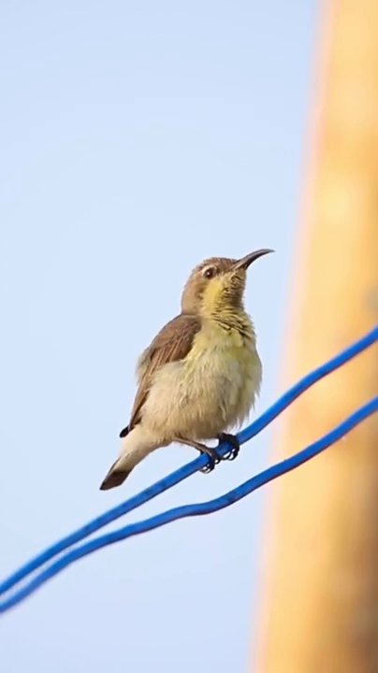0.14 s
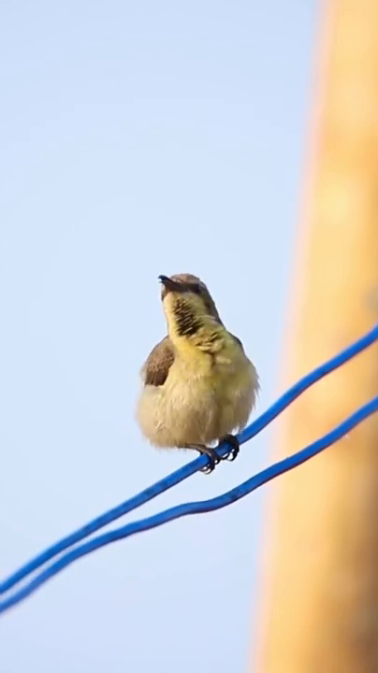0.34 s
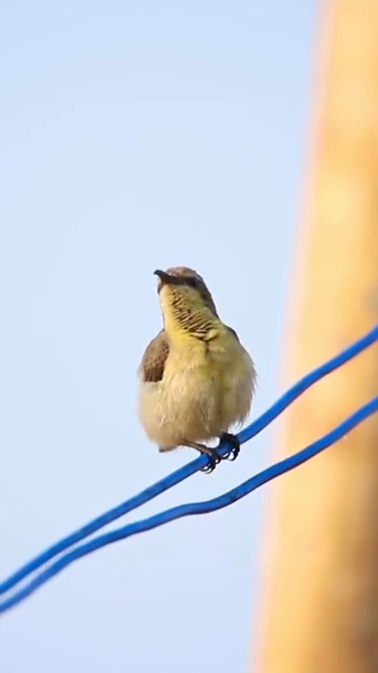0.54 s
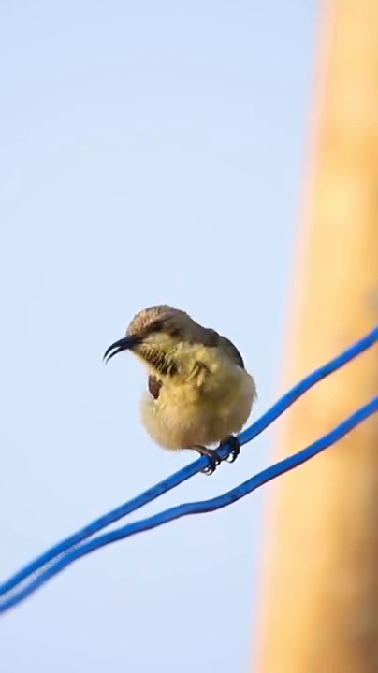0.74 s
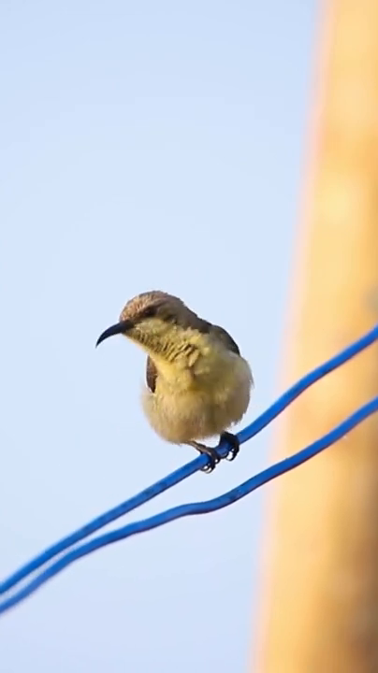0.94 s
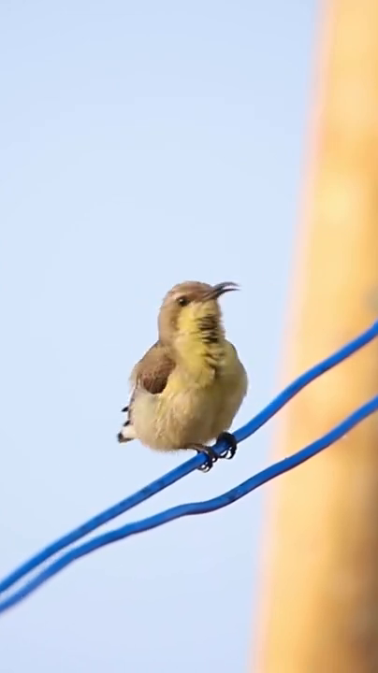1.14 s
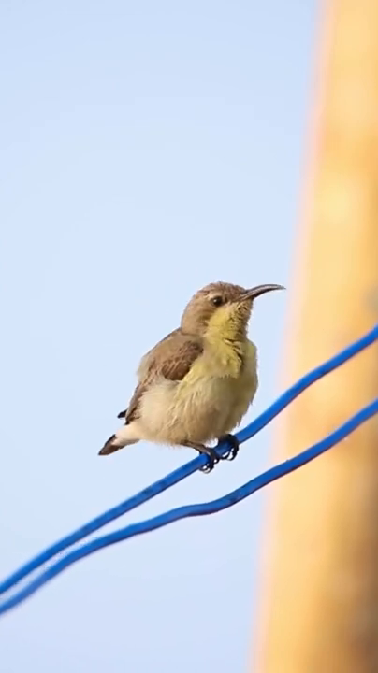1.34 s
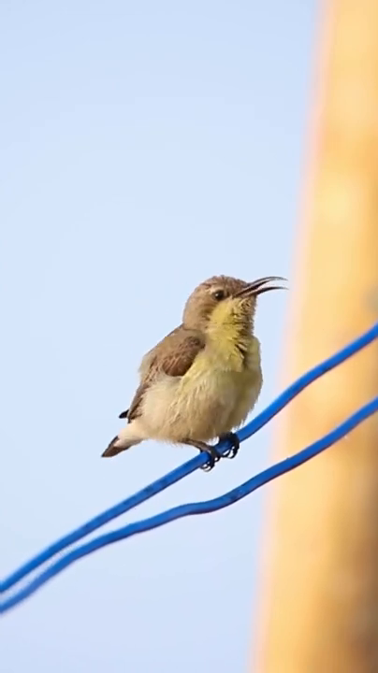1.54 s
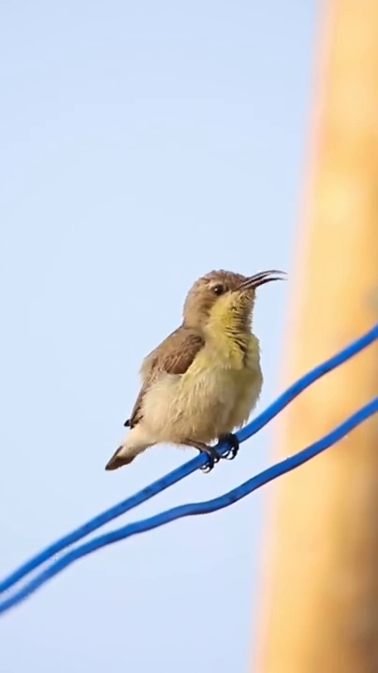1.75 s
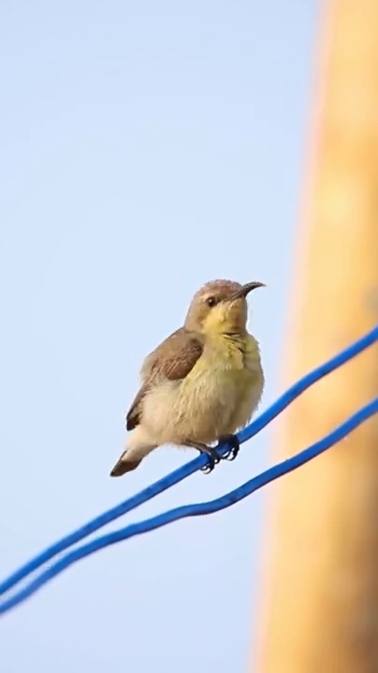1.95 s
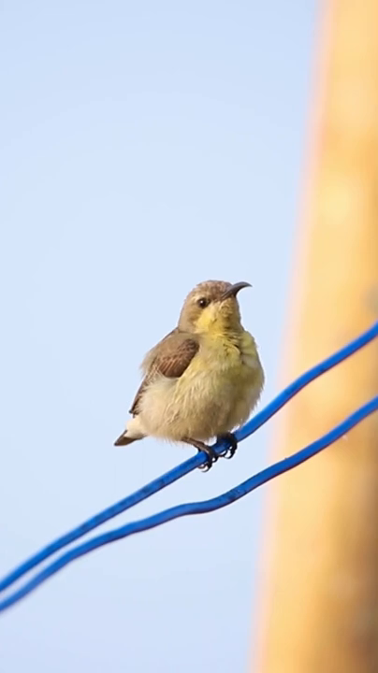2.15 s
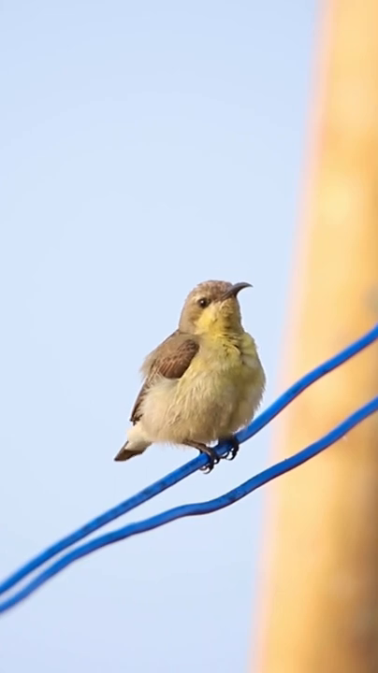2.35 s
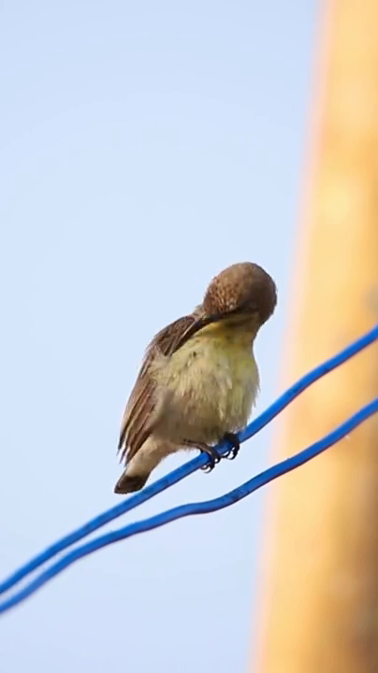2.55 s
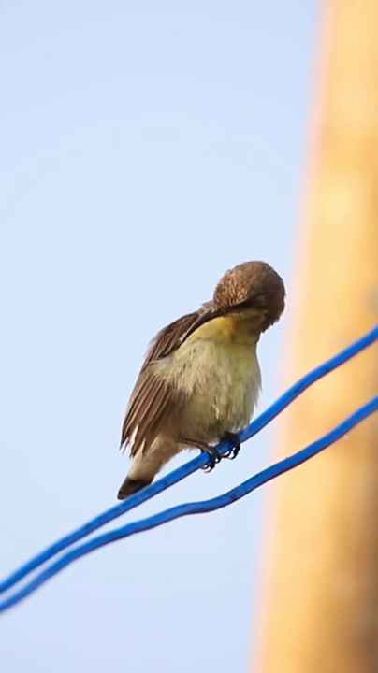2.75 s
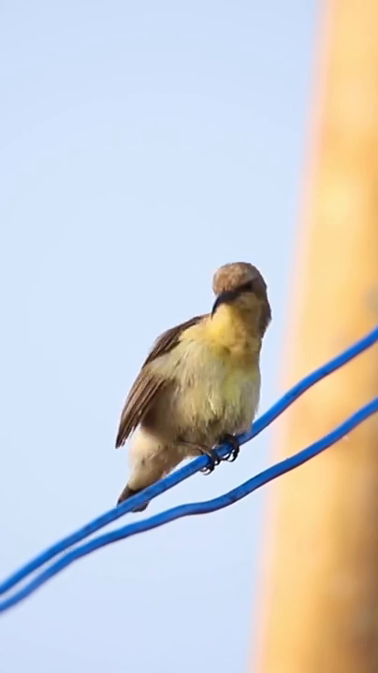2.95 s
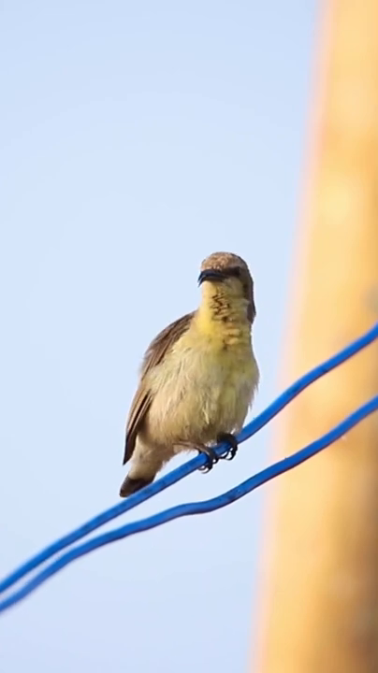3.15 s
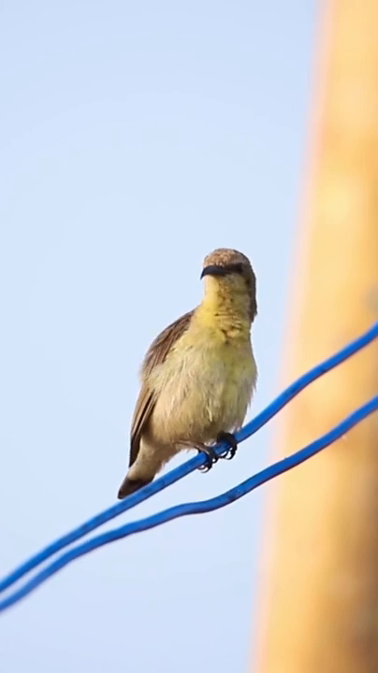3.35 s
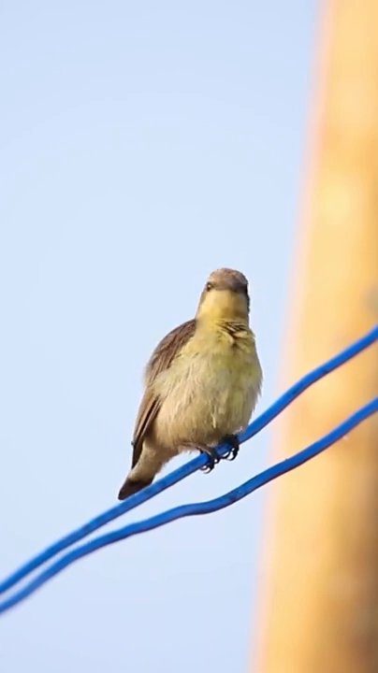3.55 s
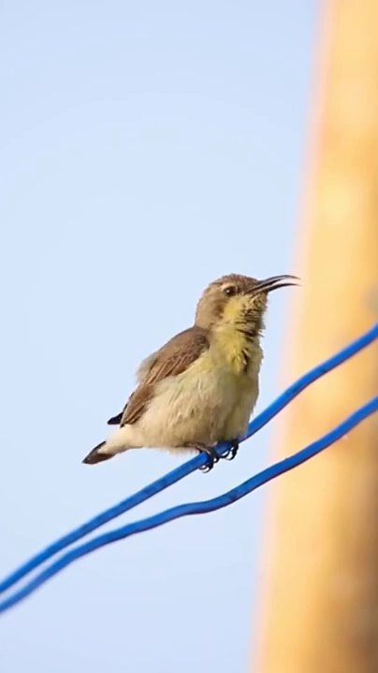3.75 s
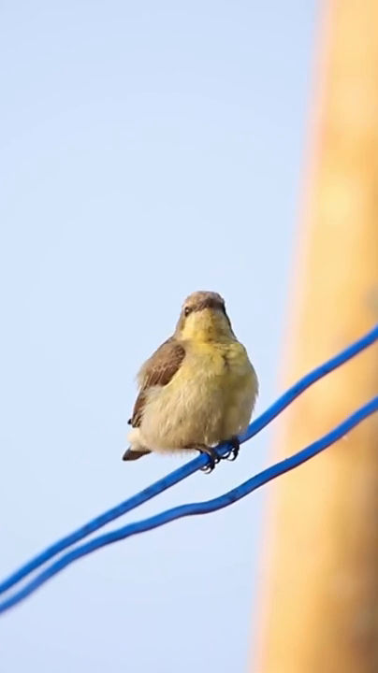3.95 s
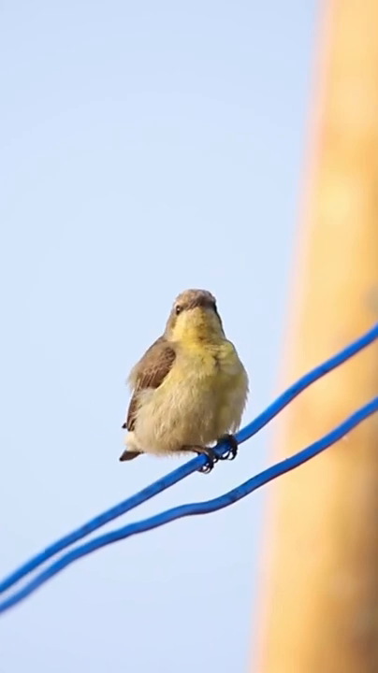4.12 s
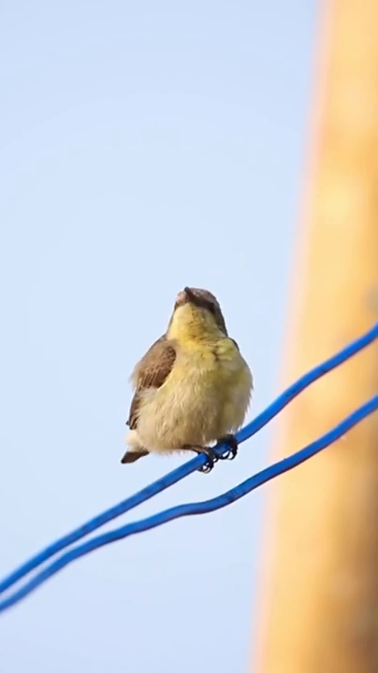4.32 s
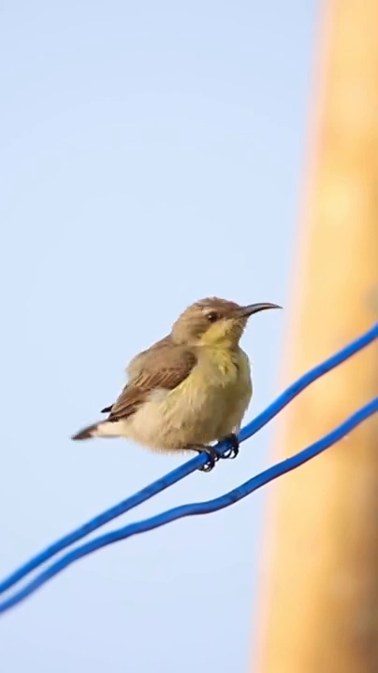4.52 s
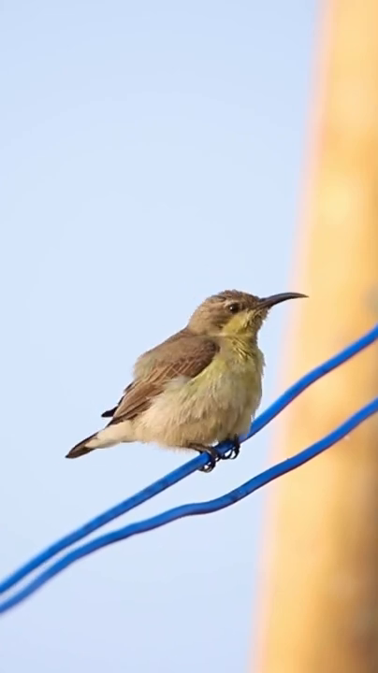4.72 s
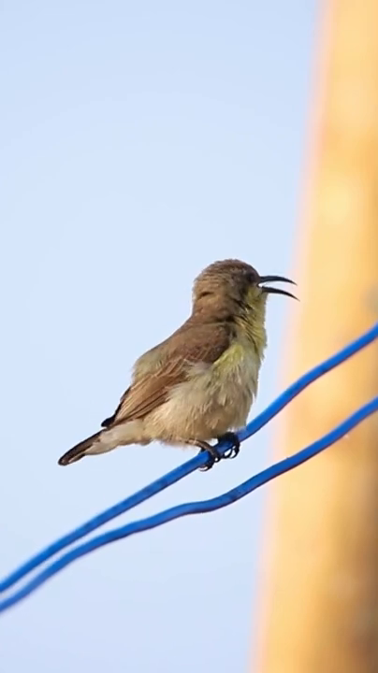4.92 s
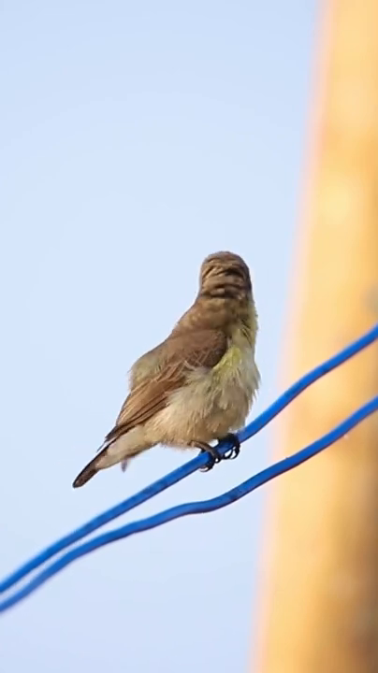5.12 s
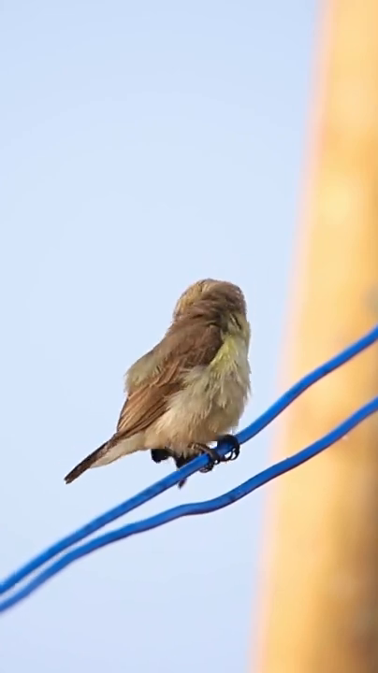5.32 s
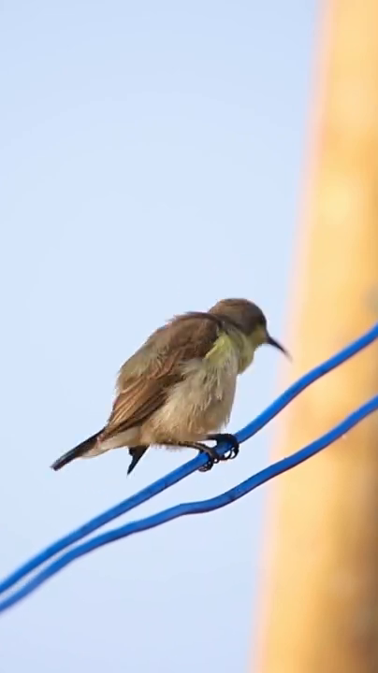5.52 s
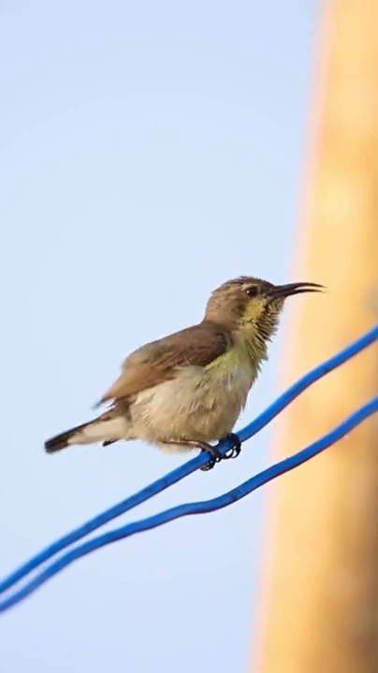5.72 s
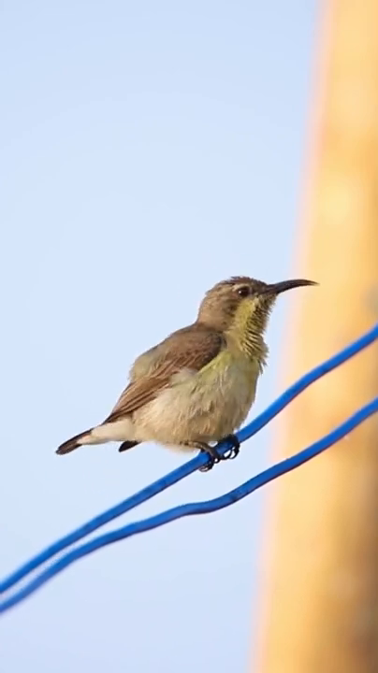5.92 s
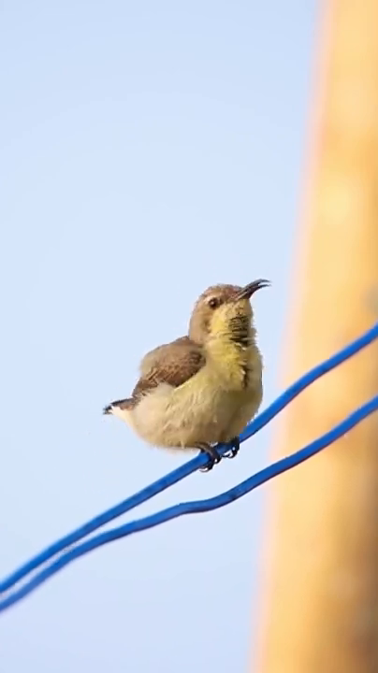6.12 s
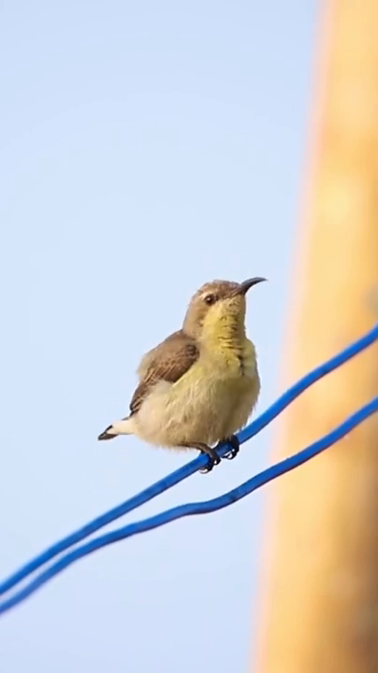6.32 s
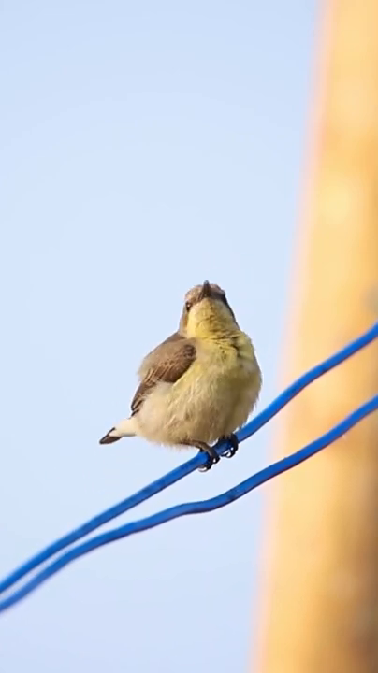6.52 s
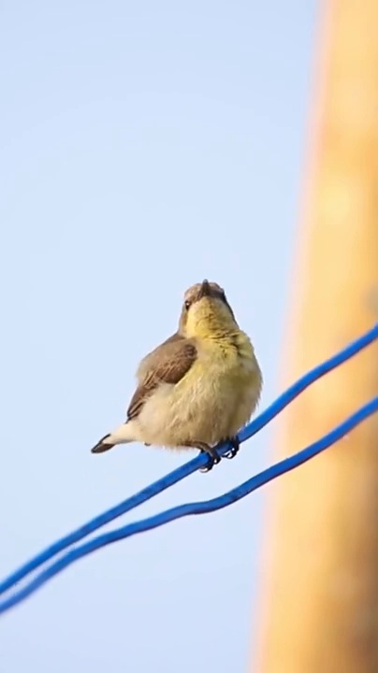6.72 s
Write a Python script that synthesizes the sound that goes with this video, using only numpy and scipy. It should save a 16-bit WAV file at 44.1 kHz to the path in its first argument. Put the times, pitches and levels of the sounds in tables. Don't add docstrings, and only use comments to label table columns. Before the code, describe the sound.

Quiet morning among houses, captured by a stereo camera microphone. One near bird dominates with irregularly spaced, rising chirps: several early, a gap around two to three seconds, then a loud one and more until the end. Beneath are soft low hum and hiss, very faint dove coos, sliding far bird calls, a barely audible distant motor tone and a steady faint high camera whine.

```python
import sys
import numpy as np
from scipy import signal
from scipy.fft import rfft, irfft, next_fast_len
from scipy.io import wavfile
from scipy.ndimage import uniform_filter1d, minimum_filter1d, map_coordinates

SR = 44100
rng = np.random.default_rng(int(sys.argv[2]) if len(sys.argv) > 2 else 0)


def boost_factor(decibels):
    exponent = np.asarray(decibels, float) / 20
    return 10 ** exponent


def generate_wav(sig):
    pcm = np.round(np.clip(np.atleast_2d(sig).T, -1, 1) * 32767).astype(np.int16)
    wavfile.write(sys.argv[1], SR, pcm)


N = 298557
T = np.arange(N) / SR


def unit(x):
    return x / np.sqrt(np.mean(x ** 2) + 1e-20)


def along(points, hz):
    f, v = np.transpose(points)
    return np.interp(np.log(hz + 1), np.log(f + 1), v)


def wobble(rate):
    knots = rng.standard_normal(int(N * rate / SR) + 4)
    return map_coordinates(knots, [T * rate])


def filtered(x, response):
    m = next_fast_len(N + SR // 2)
    return irfft(rfft(x, m) * response(np.fft.rfftfreq(m, 1 / SR)), m)[..., :N]


# time from the knee in seconds, pitch in Hz.
CLIMB = [
    (-.029, 2080),
    (-.014, 2600),
    (-.009, 3060),
    (0, 3320),
]
RASP_RISE = .055
SHELF_S, SHELF_HZ, TOP_AT = .032, 4039, 0.98


def chirp_pitch(t, knee, span, top_hz, rush, rasp_hz):
    climb, climb_hz = np.transpose(CLIMB)
    rush_s, rush_hz = rush
    rasp = rasp_hz * (1 + RASP_RISE * np.array([-.5, .5]))
    hz = np.interp(t, [knee - .052, knee - .036, *(knee + climb)], [*rasp, *climb_hz])
    rise = np.array([climb_hz[-1], SHELF_HZ, rush_hz, top_hz]) - climb_hz[-1]
    hz += np.interp(t - knee, [0, SHELF_S, rush_s, TOP_AT * span], rise)
    return uniform_filter1d(hz, size=70, mode="nearest")


RASP_OCTAVE_DB, RASP_TWELFTH_DB = -1, 0.5
OCTAVE_DB, TWELFTH_DB = -25.5, -28
BREAK_OCTAVE_DB, CLEAR_S = 9, 0.018
HALF_DB, HALF_FADE_DB_PER_S = -7.5, 1901
FLICKER_DB, HALF_TILT_DB = 4, -1


def overtones(turn, clear, after, half_db, part):
    octave_db = OCTAVE_DB + (BREAK_OCTAVE_DB - OCTAVE_DB) * np.exp(-after / CLEAR_S)
    voice = boost_factor(RASP_OCTAVE_DB + clear * (octave_db - RASP_OCTAVE_DB)) * np.sin(2 * turn)
    voice += boost_factor(RASP_TWELFTH_DB + clear * (TWELFTH_DB - RASP_TWELFTH_DB)) * np.sin(3 * turn)
    lines = 0
    for k in (3, 5, 7, 8, 9, 10):
        line_db = FLICKER_DB * wobble(80)[part] + HALF_TILT_DB * (k - 7)
        lines = lines + boost_factor(line_db) * np.sin(k / 2 * turn + k)
    return voice + boost_factor(HALF_DB + half_db - HALF_FADE_DB_PER_S * after) * lines


HISS_DB, HISS_FADE_DB_PER_S, CLEAR_HISS_DB, PUFF_DB = -8.5, 352, -42, 13.5
RASP_DB, ATTACK_S, ATTACK_DB = -25, 0.015, 16
BREAK_S, BREAK_DB, KNEE_DB = 0.033, -18.5, -8.5
JUMP_DB = 6
HOLD_DB, PUSH_AT, CREST_AT, CREST_DB = -7.5, 0.46, 0.86, -3
END_DB, RELEASE_S = -6, 0.007
# knee in seconds, glide in seconds, peak level in dB, top pitch in Hz.
CHIRPS = [
    (-0.085, 0.12, -29.5, 5294),
    (0.39, 0.12, -28, 5574),
    (0.78, .109, -28, 5560),
    (1.169, 0.12, -27, 5760),
    (1.65, .123, -28, 5486),
    (3.237, .113, -25.5, 5536),
    (3.746, 0.12, -28.5, 5500),
    (4.89, 0.12, -30.5, 5525),
    (5.793, 0.12, -28, 5390),
    (6.151, 0.13, -27.5, 5737),
]
# length before the knee in seconds, pitch in Hz,
# level of the half-pitch lines in dB.
RASPS = [(.066, 1530, -2), (.063, 1520, -1), (.066, 1550, -4), (.068, 1550, -7), (.068, 1550, -5),
         (.068, 1580, -6), (.068, 1520, 0), (.072, 1590, -2), (.064, 1560, -5), (.065, 1555, -7)]
# time after the knee in seconds, pitch in Hz.
RUSHES = [(.085, 4500), (.086, 4540), (.086, 4980), (.056, 4520), (.084, 4730), (.076, 4680), (.093, 4700),
          (.071, 4380), (.07, 4420), (.056, 4520)]
# frequency in Hz, gain in dB.
THROAT = [(700, -61), (1700, -23.5), (2500, -10.5), (3100, -8), (4600, 2), (6000, 1), (7200, -6.5),
          (8200, -13.5), (10000, -12), (16000, -15)]


def sunbird():
    x, shake, flutter = np.zeros(N), wobble(300), wobble(70)
    air = filtered(rng.standard_normal(N), lambda hz: 1 / (1 + (hz / 7500) ** 8))
    for (knee, span, db, top_hz), rush, (rasp_s, rasp_hz, half_db) in zip(CHIRPS, RUSHES, RASPS):
        start, turning, end = knee - rasp_s, knee - BREAK_S, knee + span
        part = slice(max(0, int(start * SR)), int((end + RELEASE_S) * SR))
        t = T[part]
        since, after = t - start, np.clip(t - turning, 0, 1)
        clear = np.clip(.5 + (t - turning) / 0.0035, 0, 1)

        puff_db = PUFF_DB * np.clip(1 - since / ATTACK_S, 0, 1)
        rough = boost_factor(np.maximum(HISS_DB - HISS_FADE_DB_PER_S * since + puff_db, CLEAR_HISS_DB))
        hz = chirp_pitch(t, knee, span, top_hz, rush, rasp_hz)
        hz = hz * (1 + (0.007 + .03 * rough) * shake[part] + 0.0042 * flutter[part])
        turn = 2 * np.pi * np.cumsum(hz) / SR

        upper = overtones(turn, clear, after, half_db, part)
        upper = upper * boost_factor(2.95 * wobble(90)[part])
        weak_db = JUMP_DB * np.clip((knee + CLIMB[2][0] - t) / 0.0066, 0, 1)
        voice = boost_factor(-weak_db) * np.sin(turn) + upper

        knots = [start, start + ATTACK_S, turning - .004, turning + 0.003, knee,
                 knee + PUSH_AT * span, knee + CREST_AT * span, end, end + RELEASE_S]
        levels = [RASP_DB - ATTACK_DB, RASP_DB, RASP_DB, BREAK_DB, KNEE_DB, HOLD_DB, CREST_DB, END_DB, -40]
        level = np.interp(t, knots, levels)
        x[part] += boost_factor(db + 4 + level) * (voice + 3.1 * rough * air[part])
    return filtered(x, lambda hz: boost_factor(along(THROAT, hz)))


# delay in microseconds, left later than right by microseconds,
# level in dB, left minus right in dB.
WALLS = [(1290, -240, -15.5, -.6), (3604, 223, -11, 4), (4842, 69, -14.8, -2), (5284, 0, -16.7, 2),
         (6166, -196, -17.7, -4), (6775, -14, -16.7, 2), (9610, 84, -16.7, 2), (11941, 182, -17.7, 0),
         (12940, 470, -17.7, 4), (15090, -600, -19, 0), (18170, 400, -19, -3)]


def walls(x, echo_db):
    def side(k, hz):
        total = 1
        for us, lag, db, lean in WALLS:
            delay = (us + k * lag) / 10 ** 6
            total = total + boost_factor(db + k * lean + echo_db) * np.exp(-2j * np.pi * hz * delay)
        return total
    return filtered(x, lambda hz: np.array([side(0.55, hz), side(-0.44, hz)]))


# frequency in Hz, time to fall 60 dB in seconds.
YARD = [(300, 1), (3000, 0.2), (5500, 0.25), (12000, 0.35)]


def tail(x, gap):
    hz, t, z = signal.stft(rng.standard_normal((2, SR // 2)), SR, nperseg=256)
    decay = boost_factor(-60 * t / along(YARD, hz)[:, None])
    ring = signal.istft(z * decay, SR, nperseg=256)[1]
    ring *= 1 - np.exp(-np.arange(ring.shape[1]) / SR / gap)
    return signal.fftconvolve(x[None], ring / np.linalg.norm(ring[0]), axes=1)[:, :N]


def notes(rows, arch, unsteady, rate):
    x, shake = np.zeros(N), wobble(rate)
    for s, length, hz, slide, db in rows:
        part = slice(max(0, int(s * SR)), int((s + length) * SR))
        u = (T[part] - s) / length
        pitch = hz * (1 - arch * (2 * u - 1) ** 2) + slide * (u - .5)
        pitch = pitch * (1 + unsteady * shake[part])
        swell = np.sqrt(np.abs(np.sin(np.pi * u)))
        x[part] += boost_factor(db + 8.0) * swell * np.sin(2 * np.pi * np.cumsum(pitch) / SR)
    return x


# start in seconds, length in seconds, middle pitch in Hz, slide in Hz, level in dB.
DOVES = [(.045, 0.083, 584, 93, -62.5), (.11, .139, 630, -64, -66.5), (.39, 0.21, 546, 0.5, -65.5),
         (1.16, 0.16, 552, -20, -68.5), (1.94, 0.19, 577, -42, -66.5), (2.25, 0.36, 548, -15, -72),
         (2.88, 0.15, 560, 12, -72), (3.07, .1, 560, -29, -66), (3.47, 0.079, 511, -15, -74),
         (3.64, 0.031, 578, -18, -66.5), (3.82, 0.14, 569.8, -31, -68), (4.38, 0.062, 560, 0, -68.5),
         (4.93, 0.062, 564, 4, -68), (5.48, .076, 586, -7, -71), (5.8, 0.1, 566, -5, -71.5),
         (6.02, 0.057, 550, 2, -70.5), (6.72, 0.11, 570, 14, -67.5)]
# start in seconds, length in seconds, middle pitch in Hz, slide in Hz,
# level in dB.
HORN = [
    (.8, .78, 803, -11, -78.5),
    (1.5, 0.55, 804, -15.5, -74.5),
]


def doves_and_motor():
    return notes(DOVES, 0.02, 0.01, rate=20) + notes(HORN, 0.0026, 0.0044, rate=8.4)


# start in seconds, middle pitch in Hz, level in dB.
CHIPS = [
    (.12, 2880, -69),
    (1.4, 2828, -55.5),
    (1.576, 2650, -58),
    (4.384, 2880, -61.5),
    (4.55, 2840, -70.5),
    (4.988, 2870, -58),
    (5.155, 2830, -64),
    (5.66, 2890, -69),
    (6.71, 2720, -71),
]
CHIP_S, CHIP_SLIDE_HZ = 0.0427, 423
# start within the call in seconds, length in seconds, middle pitch in Hz,
# slide in Hz, level in dB.
PHRASE = [
    (-.005, .066, 6780, -900, 1.5),
    (0.186, .09, 5930, -780, 1.5),
]
# start in seconds, level in dB.
PHRASES = [
    (1.99, -70),
    (4.21, -66.5),
]


def far_birds():
    chips = [(s, CHIP_S, hz, CHIP_SLIDE_HZ, db) for s, hz, db in CHIPS]
    pairs = []
    for s, db in PHRASES:
        for late, length, hz, slide, step in PHRASE:
            pairs.append((s + late, length, hz, slide, db + step))
    return notes(chips, 0.022, .034, rate=270) + notes(pairs, -0.033, 0.025, rate=150)


# start in seconds, length in seconds, middle pitch in Hz, slide in Hz,
# level in dB.
WHISTLES = [
    (1, 0.038, 2660, -80, -76),
    (1.068, 0.085, 2830, 475, -68),
    (1.25, .065, 2980, -510, -69),
    (1.3, .11, 2830, 59, -71.5),
    (6.51, .047, 2950, -490, -75.5),
]


def far_whistler():
    return notes(WHISTLES, -0.027, 0.005, rate=140)


# start in seconds, level in dB, pitch in Hz, time to fall 60 dB in
# seconds.
THUMP = (.0035, -33, 680, .03)


def thump():
    s, db, hz, t60 = THUMP
    t = np.clip(T - s, 0, 1)
    return boost_factor(db - 60 * t / t60) * (1 - np.exp(-t / 0.0017)) * np.sin(2 * np.pi * hz * t)


# share of the frame, pitch in Hz, level in dB.
LENS = [
    (0, 11100, -67),
    (.14, 11070, -72),
    (.2, 10710, -62.5),
    (.5, 10780, -62),
    (.82, 10800, -63.5),
    (.88, 11140, -77),
]
FRAME_RATE, FRAME_START = 29.97, .0063


def lens():
    share, hz, db = np.transpose(LENS)
    u = (T - FRAME_START) * FRAME_RATE % 1
    pitch = np.interp(u, share, hz, period=1) + 14 * wobble(25)
    level = np.interp(u, share, db, period=1) + 3.0 + 0.78 * wobble(40)
    x = boost_factor(level) * np.sin(2 * np.pi * np.cumsum(pitch) / SR)
    return x * boost_factor([[0], [-13]])


# frequency in Hz, level in dB per Hz.
HUM = [(12, -27), (20, -7.5), (53, -1.5), (145, -6), (197, -4), (455, -8), (537, 0), (635, -4.5),
       (1050, -7.5), (1280, -10.5), (2110, -13), (5290, -15.5), (10000, -19.5), (10900, -23),
       (15700, -28.5)]
# frequency in Hz, left-right likeness from 0 to 1.
ALIKE = [(30, 0.78), (80, 0.66), (200, 0.16), (1000, 0.14), (8000, 0.0333)]
# frequency in Hz, left minus right in dB.
LEAN = [(30, -2), (170, 3.5), (350, 1), (600, -4), (1400, 1.5), (8000, -0.5)]
TOWN_DB, SETTLE_DB, SETTLE_S = -62, 3, 0.045


def hum(patchy_db):
    z = signal.stft(rng.standard_normal((2, N)), nperseg=512)[2]
    field = uniform_filter1d(rng.standard_normal(z.shape[1:]), size=6, axis=0)
    field = uniform_filter1d(field, size=14, axis=1)
    pair = signal.istft(z * boost_factor(patchy_db * unit(field)), nperseg=512)[1][:, :N]

    def spread(hz):
        turn = np.arccos(np.clip(along(ALIKE, hz), -1, 1)) / 2
        return boost_factor(along(HUM, hz)) * [np.cos(turn), np.sin(turn)]

    mid, side = filtered(pair, spread)
    both = np.array([mid + side, mid - side])
    both = filtered(both, lambda hz: boost_factor(np.outer([.5, -.5], along(LEAN, hz))))
    level = TOWN_DB + SETTLE_DB * np.exp(-T / SETTLE_S) + 0.14 * wobble(1.87) + 4.0
    return boost_factor(level) * unit(both)


def scene():
    bird = sunbird()
    yard = 0
    for knee, *_ in CHIRPS:
        yard = yard + tail(bird * (np.abs(T - knee) < .17), gap=0.0016)
    near = boost_factor([[-1.1], [1.1]]) * (walls(bird, echo_db=1.5) + boost_factor(-6.5) * yard)
    doves = doves_and_motor()
    cooing = doves * boost_factor([[-3.5], [.6]]) + boost_factor(-21.0) * tail(doves, gap=0.0036)
    far, clear = far_birds(), far_whistler()
    calls = far * boost_factor([[-6.1], [-5.9]]) + clear + boost_factor(-4.0) * tail(far + 0.7 * clear, gap=0.0022)
    return near + cooing + calls + thump() + lens() + hum(patchy_db=0.89)


# frequency in Hz, share of bands dropped.
THRIFT = [(4000, 0.00082), (7000, .015), (10000, .04), (12000, 0.11), (15000, .2)]


def masked(x, under_db, slope_db, scatter_db):
    window = np.sin(np.pi * (np.arange(2048) + .5) / 2048)
    hz, _, z = signal.stft(x, SR, window, nperseg=2048)
    band = (hz // 260).astype(int)
    power = np.array([np.mean(np.abs(z[:, band == k]) ** 2, axis=(0, 1)) for k in range(band[-1] + 1)])
    centre = np.arange(len(power)) + .5
    octaves = np.log2(centre[:, None] / centre)
    reach = boost_factor(2 * (under_db - slope_db * octaves)) * (octaves > 0) * (centre > 12)
    cover = reach @ (power + .5 * np.roll(power, 1, axis=1))
    cover *= boost_factor(2 * scatter_db * rng.standard_normal(power.shape))
    keep = np.clip(2 * np.log(power / (cover + 1e-30) + 1e-30), 0, 1)
    floor = minimum_filter1d(np.median(power, axis=1), size=7)
    faint = power < 3 * floor[:, None]
    keep *= 1 - faint * (rng.random(power.shape) < along(THRIFT, centre * 260)[:, None])
    return signal.istft(z * keep[band], SR, window, nperseg=2048)[1][:, :N]


def top_cut(x):
    return signal.sosfilt(signal.butter(12, 16170, fs=SR, output="sos"), x)


def record(dry):
    mix = masked(dry, under_db=-28, slope_db=34, scatter_db=2)
    return top_cut(mix)


dry = scene()
out = record(dry)
generate_wav(out)
```